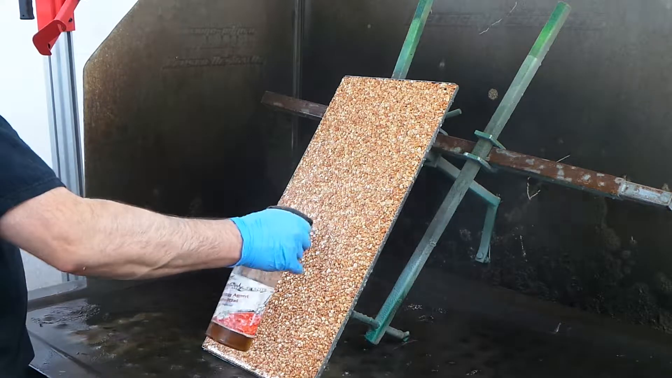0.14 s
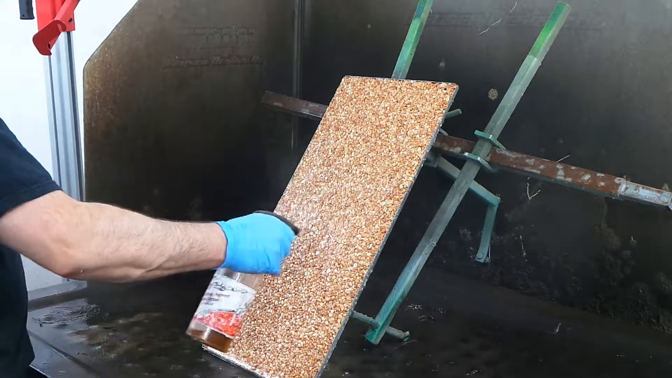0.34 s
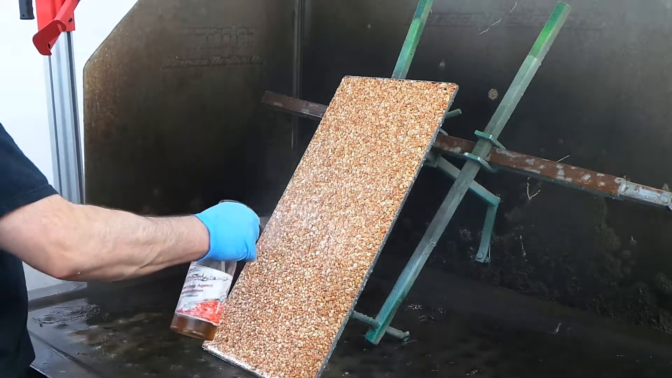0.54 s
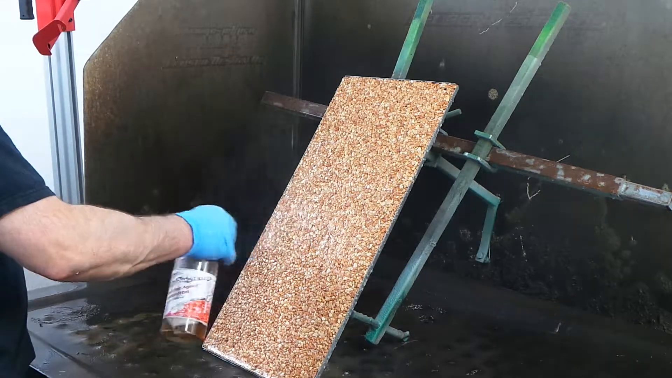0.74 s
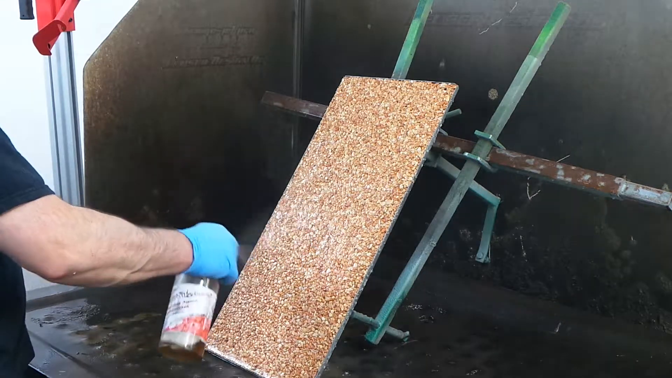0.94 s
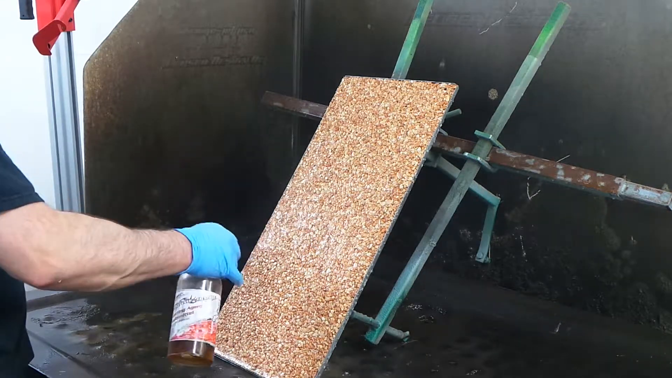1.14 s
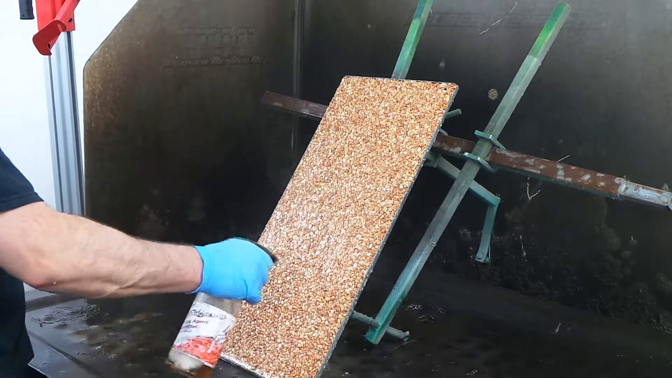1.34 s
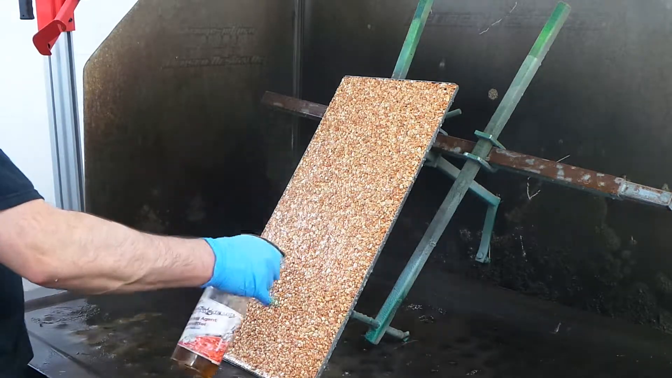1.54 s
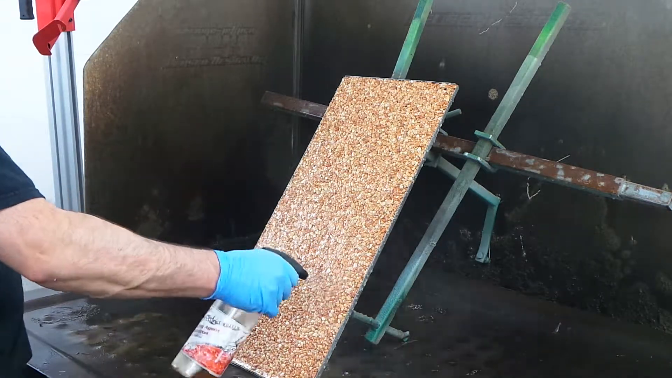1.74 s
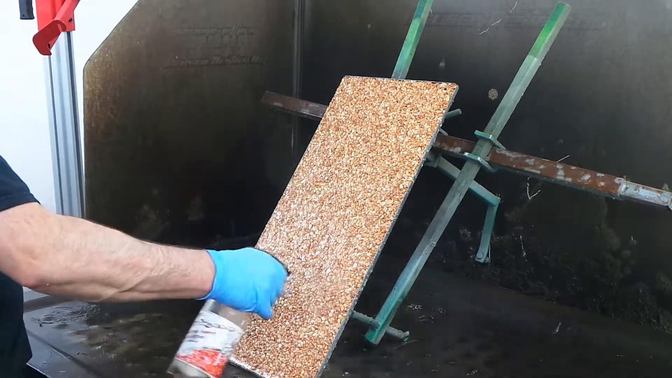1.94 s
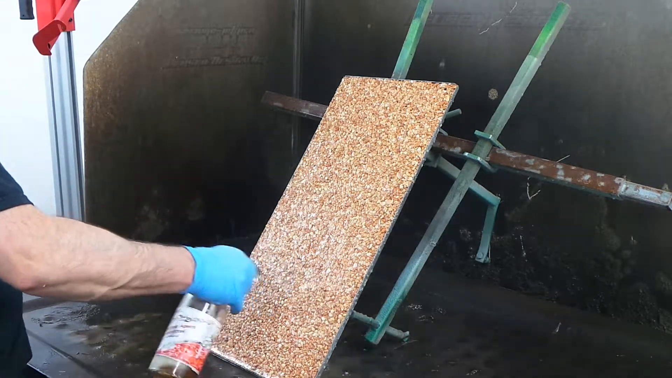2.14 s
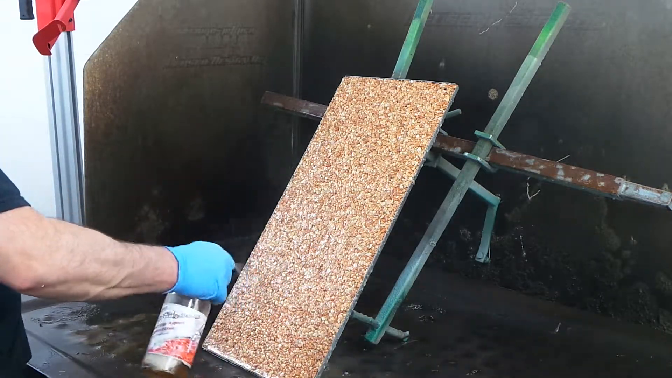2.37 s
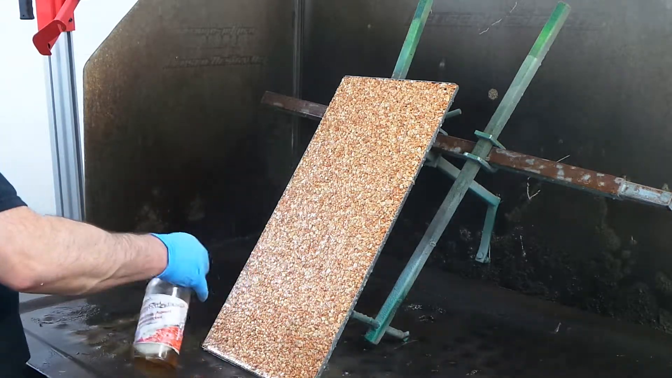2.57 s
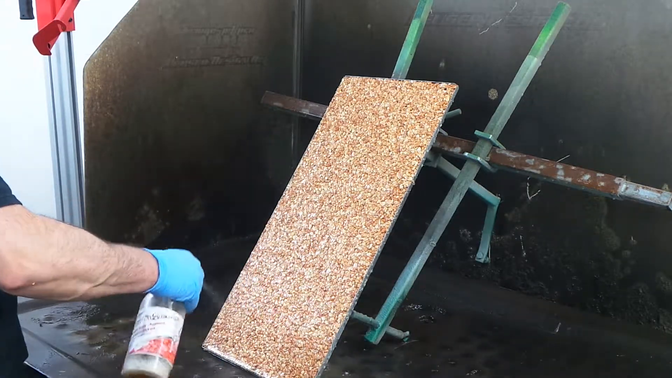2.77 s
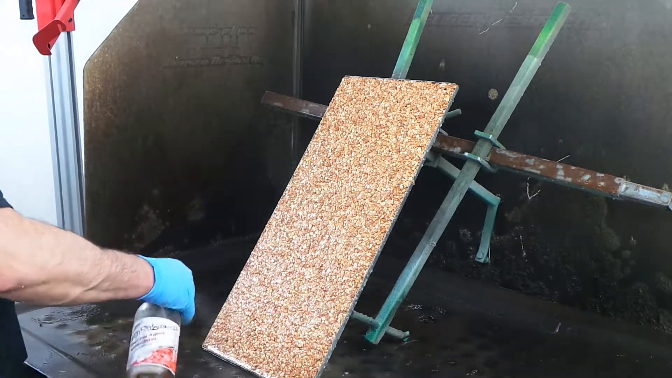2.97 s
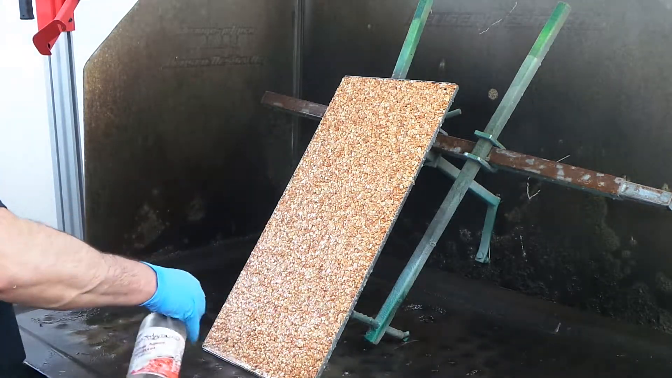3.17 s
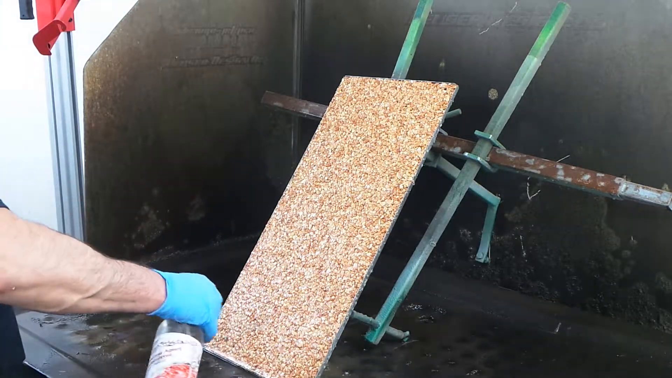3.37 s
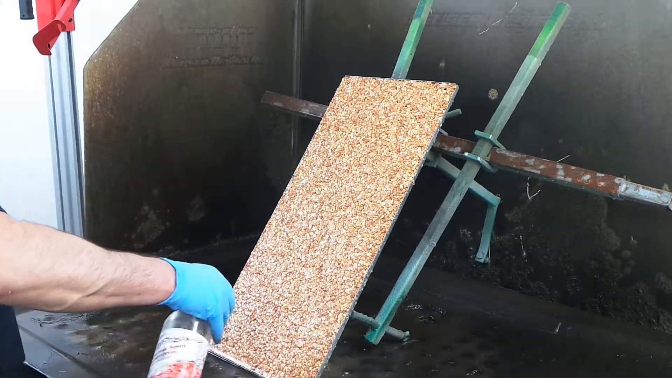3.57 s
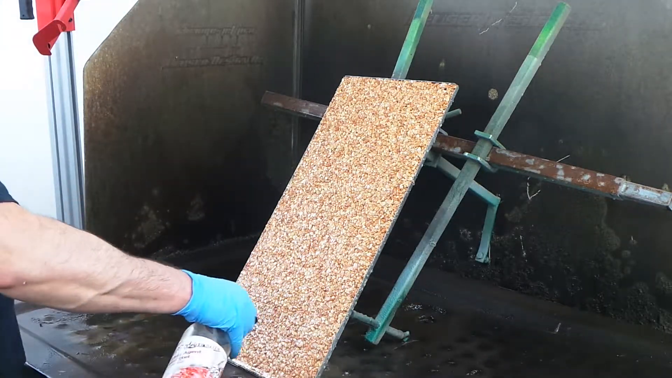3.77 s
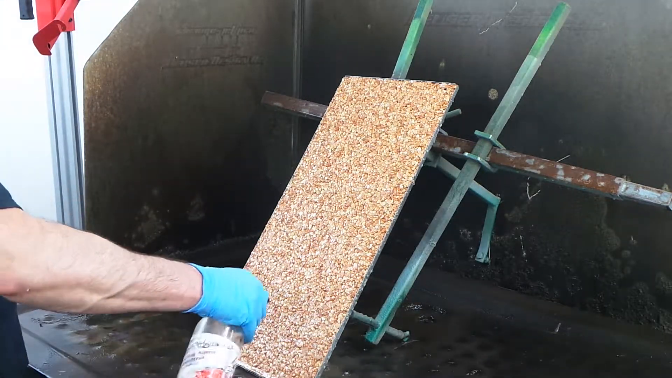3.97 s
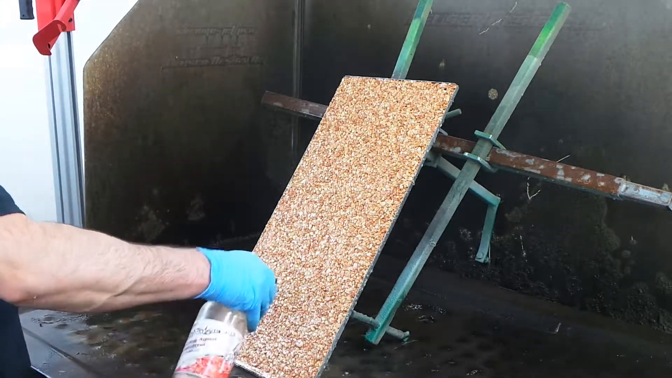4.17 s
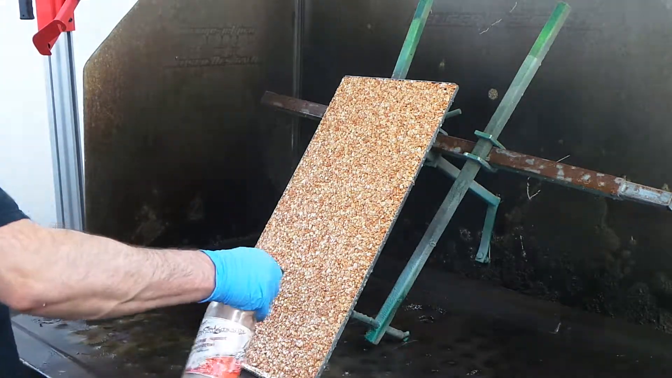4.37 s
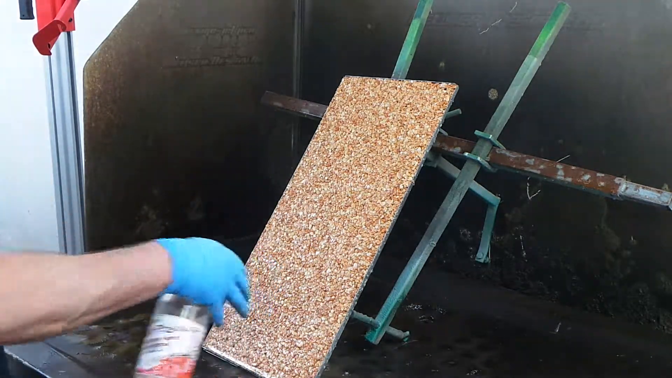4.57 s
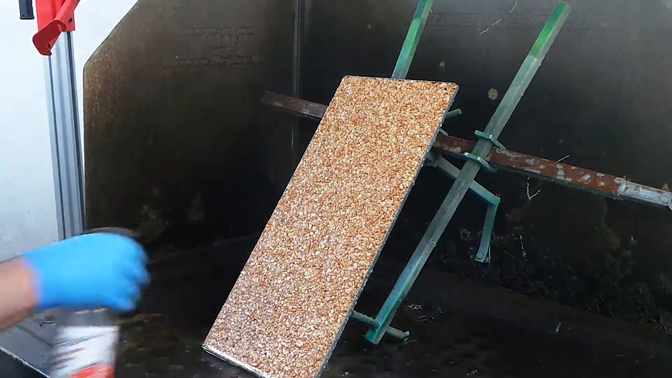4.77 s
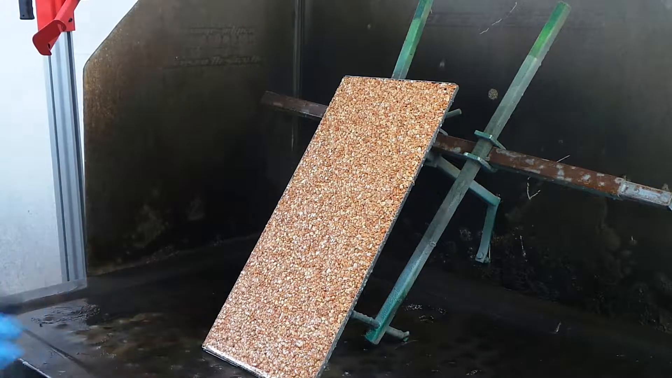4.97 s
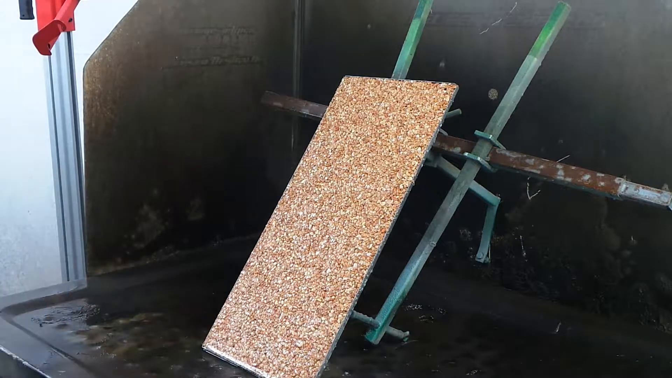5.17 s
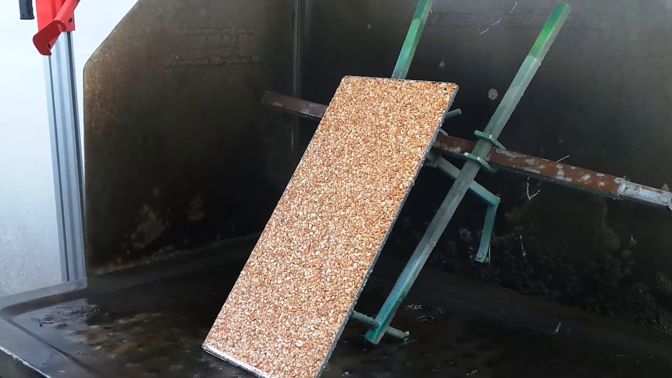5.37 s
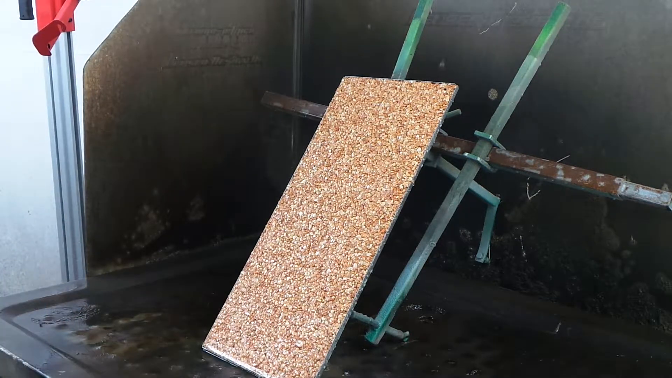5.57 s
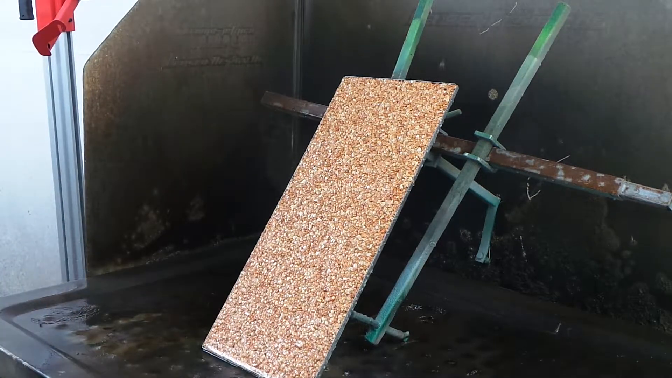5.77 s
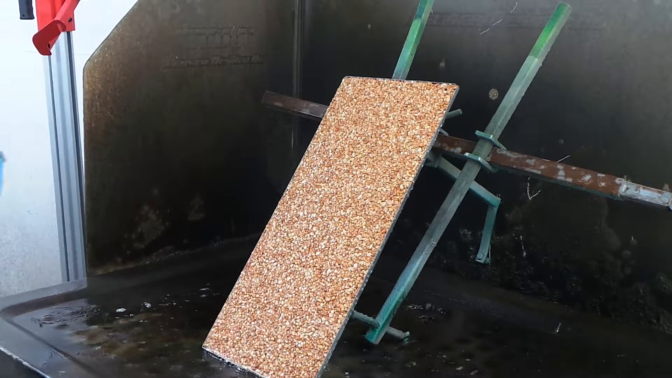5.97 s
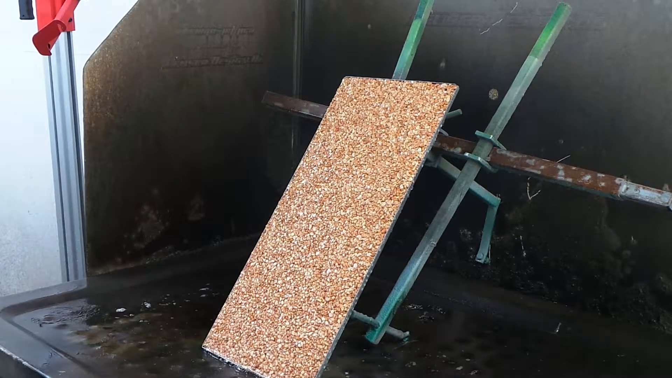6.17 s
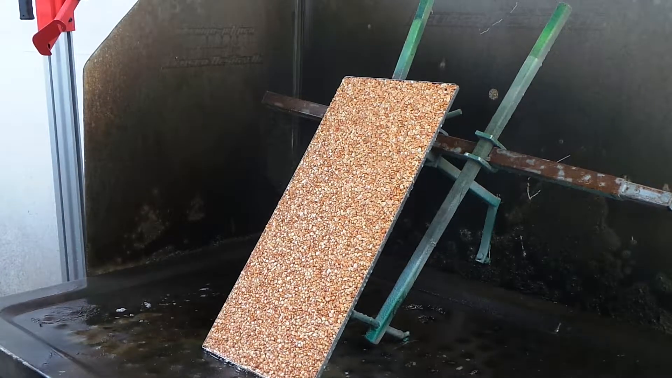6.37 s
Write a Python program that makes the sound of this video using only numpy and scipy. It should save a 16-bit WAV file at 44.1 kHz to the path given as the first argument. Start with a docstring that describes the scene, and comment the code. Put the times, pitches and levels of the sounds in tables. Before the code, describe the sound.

A trigger spray bottle squirts hissing mist onto a board about three times a second, then stops, over faint air hiss and hum.

```python
"""Trigger bottle in a spray booth

A hand trigger bottle is squeezed about three times a second towards a board in a metal spray booth.
Each squeeze opens the valve with a tick, then mist hisses from the nozzle and patters on the board.
A low thud and a later sharp tap sound nearby; an air hiss and a mains hum run throughout."""
import sys
import numpy as np
from scipy import signal
from scipy.fft import rfft, irfft, next_fast_len
from scipy.io import wavfile

SR = 44100
rng = np.random.default_rng(int(sys.argv[2]) if len(sys.argv) > 2 else 0)


def unload_audio(sound):
    """Save the sound as a 16-bit wav file, at the path given as the first command line argument."""
    columns = np.transpose(np.atleast_2d(sound))
    # keep every value between -1 and 1, then stretch to whole-number steps
    steps = np.round(np.clip(columns, -1, 1) * 32767)
    wavfile.write(sys.argv[1], SR, steps.astype(np.int16))


N = 283122

LOW_EDGES_HZ = np.geomspace(120, 1900, 13)


def amp(db):
    """dB to gain."""
    return 10 ** (np.asarray(db) / 20)


def rms_one(x):
    """Scales to rms 1."""
    return x / np.sqrt(np.mean(x ** 2) + 1e-20)


def in_time(rows):
    """Rows of (time_s, value) as a curve over all samples."""
    return np.interp(np.arange(N) / SR, *np.transpose(rows))


def bandpass(x, order, low_hz, high_hz):
    """Butterworth band-pass."""
    return signal.sosfilt(signal.butter(order, [low_hz, high_hz], "band", fs=SR, output="sos"), x)


def coloured(x, spectrum):
    """Shapes x by rows of (freq_hz, gain_db); rms 1."""
    size = next_fast_len(N)
    bin_hz = np.maximum(np.arange(size // 2 + 1) * SR / size, 1)
    freq_hz, gain_db = np.transpose(spectrum)
    gain = amp(np.interp(np.log(bin_hz), np.log(freq_hz), gain_db))
    return rms_one(irfft(rfft(x, size) * gain, size)[:N])


def drift(rate_hz):
    """Smooth random curve; rms 1."""
    hop, settle = 20, 4000
    r = np.exp(-2 * np.pi * rate_hz * hop / SR)
    white = rng.standard_normal(N // hop + settle + 2)
    slow = signal.lfilter([1], [1, -2 * r, r * r], white)[settle:]
    return np.interp(np.arange(N) / hop, np.arange(len(slow)), rms_one(slow))


def patchy(x, edges_hz, depth_db, rate_hz):
    """Each band swells and sinks on its own, the lowest most; rms 1."""
    size = next_fast_len(N)
    spectrum, out = rfft(x, size), x.copy()
    bins = (edges_hz * size / SR).astype(int)
    for k, (low, high) in enumerate(zip(bins, bins[1:])):
        band = np.zeros_like(spectrum)
        band[low:high] = spectrum[low:high]
        gain = amp(depth_db * 0.93 ** k * drift(rate_hz))
        out += irfft(band, size)[:N] * (gain - 1)
    return rms_one(out)


def droplets(per_s, spread_db):
    """Random impacts of uneven size."""
    sizes = amp(spread_db * np.minimum(rng.exponential(1, N), 4)) * rng.choice([-1, 1], N)
    return sizes * (rng.random(N) < per_s / SR)


def strike(start_s, level_db, modes):
    """Each blow rings every mode with a randomly varied strength."""
    out, at = np.zeros(N), (start_s * SR).astype(int)
    scatter_db = rng.normal(0, 2.5, (len(at), len(modes)))
    for k, (pitch_hz, gain_db, t60_s) in enumerate(modes):
        clicks = np.full(N, 1e-18)
        clicks[at] = (-1) ** k * amp(level_db + gain_db + scatter_db[:, k])
        r, w = amp(-60 / (t60_s * SR)), 2 * np.pi * pitch_hz / SR
        out += signal.lfilter([0, np.sin(w)], [1, -2 * r * np.cos(w), r * r], clicks)
    return out


def echo(start_s, spectrum, level_db, rise_s, t60_s):
    """Reflections build up, then die away as coloured noise."""
    since_s = np.maximum(np.arange(N) / SR - start_s, 0)
    envelope = amp(level_db - 60 * since_s / t60_s) * (1 - np.exp(-since_s / rise_s))
    return envelope * coloured(rng.standard_normal(N), spectrum)


def air_hiss():
    """Broad, wavering air noise with narrow duct resonances."""
    spectrum = [(15, -58), (25, -20), (60, -14.5), (85, -6), (130, -17), (400, -14), (520, -21.5),
                (680, -16.5), (900, -21), (1080, -17), (1300, -15), (2900, -19), (3700, -15), (6000, -13),
                (11900, -7.5), (14400, -8)]  # broad hiss: freq_hz, gain_db
    resonances = [(140, 18, -4.5), (276, 16.4, -9.5), (422, 16, -1.5), (895, 52, -4.5), (1410, 4.9, 4),
                  (1492, 13, -3.5), (1782, 10.4, 2.5), (1895, 37, -11), (1966, 28, -1), (2075, 65, -3.5),
                  (2291, 57, -1.5), (2525, 41, -7), (2742, 29, -5), (3120, 8.1, 0), (3390, 73, -10.5),
                  (3744, 16, 2), (7120, 53, 0), (7490, 270, -5.5), (7850, 56, -3.5), (12100, 290, -1),
                  (12500, 90, -22), (12950, 39, 2)]  # duct modes: pitch_hz, width_hz, gain_db
    levels = [(0.0, -46), (3.0, -44.5), (4.4, -44.5), (5.45, -46.5), (6.42, -44.5)]  # hiss envelope: time_s, level_db
    broad, drive = rng.standard_normal((2, N))
    ducts = np.zeros(N)
    for pitch_hz, width_hz, gain_db in resonances:
        r, w = np.exp(-np.pi * width_hz / SR), 2 * np.pi * pitch_hz / SR
        ring = signal.lfilter([1 - r * r, 0, r * r - 1], [1, -2 * r * np.cos(w), r * r], drive)
        ducts += amp(gain_db) * ring
    air = coloured(broad, spectrum) + amp(-7) * rms_one(ducts)
    return amp(in_time(levels)) * patchy(air, LOW_EDGES_HZ, depth_db=4.8, rate_hz=10.5)


def mains_hum(pitch_hz=100.1):
    """A low tone wavering in level and phase."""
    levels = [(0, -63), (4.3, -65.5), (5.0, -67), (6.42, -67)]  # hum envelope: time_s, level_db
    gain = amp(in_time(levels) + 1.3 * drift(4.8))
    phase = 2 * np.pi * pitch_hz * np.arange(N) / SR + 0.34 * drift(6.8)
    return gain * np.sqrt(2) * np.sin(phase)


def squeezes():
    """Gains of jet, patter, fizz and drumming: each squeeze leaps, swells, is held, then drains."""
    # trigger strokes, the last three columns relative to the jet:
    # start_s, open_db, swell_s, full_db, hold_s, sag_db, patter_db, fizz_db, drum_db
    strokes = [ (-0.150, -43, 0.098, -40.5, 0.054, -2.5, -9, -0.5, -8.5),
               (0.203, -41.5, 0.087, -37.5, 0.083, 1.5, -9.5, -1, -8.5),
               (0.554, -41, 0.12, -37.5, 0.061, 3.5, -9, -1, -10.5),
               (0.894, -46, 0.12, -38, 0.061, 2, -10, -0.5, -8.5),
               (1.245, -45, .12, -36.5, 0.055, 2, -9, 0, -12),
               (1.604, -44.5, .078, -37.5, 0.082, -0.5, -13, 0.5, -13),
               (1.930, -55, 0.12, -38, 0.09, -1.3, -11, 0.5, -11),
               (2.328, -49.5, 0.098, -38.5, 0.089, 1, -10, 1.3, -18.5),
               (2.690, -44, 0.087, -38.5, 0.076, 1.9, -12.5, 0.5, -22),
               (3.021, -47, 0.12, -37, 0.04, 0.5, -11.5, 1, -19),
               (3.320, -54, 0.12, -37.5, 0.099, 1.5, -16, 2, -30),
               (3.704, -43.5, 0.046, -38, 0.13, 5.5, -22, -1, -45),
               (4.015, -49.5, 0.06, -38, 0.1, .3, -15, 1.1, -55),
               (4.332, -45.5, 0.086, -33, .01, 1, -30, 1.6, -57), ]
    open_db_per_s, drain_db_per_s, drum_db_per_s = 800, 114.5, 50
    linger_db, linger_db_per_s = -24.5, 30
    t, power = np.arange(0, N / SR + 0.002, 0.001), 0
    for start_s, open_db, swell_s, full_db, hold_s, sag_db, patter_db, fizz_db, drum_db in strokes:
        since_s = t - start_s
        after_s = np.maximum(since_s - swell_s - hold_s, 0)
        push_db = np.interp(since_s, [0, swell_s, swell_s + hold_s], [open_db, full_db, full_db - sag_db])
        # pressure drains fast; the last mist lingers
        drain_db = np.maximum(-drain_db_per_s * after_s, linger_db - linger_db_per_s * after_s)
        jet_db = push_db + drain_db + open_db_per_s * np.minimum(since_s, 0)
        # a weak jet spatters more and fizzes less
        below_db = np.maximum(full_db - jet_db, 0)
        patter_rel_db = np.interp(below_db, [0, 15.5], [patter_db, -2.5])
        fizz_rel_db = fizz_db - below_db * np.where(since_s < swell_s, 0.3, 0.4)
        # the first slug of liquid drums hardest
        drum_rel_db = drum_db - drum_db_per_s * np.maximum(since_s, 0)
        power += amp(jet_db + np.array([0 * t, patter_rel_db, fizz_rel_db, drum_rel_db])) ** 2
    return [np.interp(np.arange(N) / SR, t, np.sqrt(p)) for p in power]


def spray():
    """Turbulent mist at the nozzle, fine fizz on top, droplets pattering and drumming on the board."""
    nozzle = [(700, -63), (1100, -23), (2000, -6), (3330, -5.5), (4070, -2.5), (5080, -1), (5980, 0),
              (9500, -0.5), (12400, -33), (20900, -120)]  # jet spectrum: freq_hz, gain_db
    board_face = [(380, -19), (650, -6), (815, -8.5), (1200, -0.5), (1750, 0), (2800, 1), (3640, -1),
                  (6160, -120)]  # patter spectrum: freq_hz, gain_db
    board_body = [(110, -6), (150, -12), (250, 3), (340, -5.5), (450, 2), (600, -5.5), (720, 0), (830, 6),
                  (950, -4.5), (1200, -24.5)]  # drumming spectrum: freq_hz, gain_db
    jet_gain, patter_gain, fizz_gain, drum_gain = squeezes()
    sputter = amp(0.17 * drift(28) + 0.5 * drift(220))  # liquid leaves the nozzle unevenly
    jet = coloured(droplets(per_s=14000, spread_db=1.2), nozzle)
    fizz = bandpass(droplets(per_s=16000, spread_db=1.2), 4, low_hz=9760, high_hz=15500)
    landing = patchy(droplets(per_s=7000, spread_db=2.9), LOW_EDGES_HZ, depth_db=5.76, rate_hz=11.7)
    jet = patchy(jet, np.geomspace(1500, 10000, 9), depth_db=1.4, rate_hz=15)
    fizz = patchy(fizz, np.linspace(9000, 14600, 8), depth_db=0.62, rate_hz=4.4)
    board = patter_gain * coloured(landing, board_face) + drum_gain * coloured(landing, board_body)
    return sputter * (jet_gain * jet + fizz_gain * fizz + board)


def valve(spit_t60_s=0.032):
    """A plastic tick, a spit of air and liquid, and a knock from the bottle."""
    ticks = [(.183, -38, -55, -54), (.197, -32, -47, -52), (.211, -30, -42, -53), (0.221, -19, -47, -57),
             (0.551, -31, -48, -71), (.559, -29, -44, -66), (0.5676, -26, -39, -46),
             (0.8958, -35, -35, -56), (0.898, -30, -41, -66), (0.9026, -34, -52, -62),
             (1.249, -25, -47, -52), (1.595, -38, -49, -61), (1.6087, -25, -36.5, -64),
             (1.929, -40, -55, -58), (2.3508, -40.5, -45, -63), (2.689, -42, -38, -63),
             (2.7103, -32, -36, -66), (3.023, -33, -43, -72), (3.707, -35, -33, -50.5),
             (4.27, -38, -54, -60)]  # valve ticks: start_s, tick_db, spit_db, knock_db
    tick_modes = [(2400, -35, 0.0044), (3670, -31, 0.0059), (5300, -6.5, 0.0051), (7400, -10, .005),
                  (10000, -19, 0.0036), (12500, -21, .003)]  # valve modes: pitch_hz, gain_db, t60_s
    knock_modes = [(328, 4.5, 0.051), (466, 6.5, 0.01), (860, -3, 0.034)]  # bottle modes: pitch_hz, gain_db, t60_s
    spit_spectrum = [(900, -46), (1800, 3.5), (3500, -2), (6000, 3), (10000, -12), (14400, -4)]  # spit noise: freq_hz, gain_db
    start_s, tick_db, spit_db, knock_db = np.transpose(ticks)
    openings = np.full(N, 1e-18)
    openings[(start_s * SR).astype(int)] = amp(spit_db)
    envelope = signal.lfilter([1], [1, -amp(-60 / (spit_t60_s * SR))], openings)
    spit = envelope * coloured(rng.standard_normal(N), spit_spectrum)
    return strike(start_s, tick_db, tick_modes) + spit + strike(start_s, knock_db, knock_modes)


def sizzles(width_hz=450):
    """Air drawn into the jet makes the nozzle sing briefly in a narrow band."""
    bursts = [(2.48, .06, 13500, -46), (2.705, .03, 12500, -55), (2.76, .03, 13000, -44),
              (3.1, .04, 14100, -44), (3.165, .05, 14400, -47), (3.48, .06, 13900, -45),
              (4.1, .05, 14300, -67), (4.417, .04, 9400, -48)]  # nozzle sizzles: centre_s, length_s, pitch_hz, level_db
    t, white, out = np.arange(N) / SR, rng.standard_normal(N), np.zeros(N)
    for centre_s, length_s, pitch_hz, level_db in bursts:
        band = bandpass(white, 2, pitch_hz - width_hz / 2, pitch_hz + width_hz / 2)
        envelope = amp(level_db) * np.exp(-(2 * (t - centre_s) / length_s) ** 2)
        out += envelope * rms_one(band)
    return out


def thud():
    """A soft heavy contact in several bumps rings low modes; the room rumbles after it."""
    bumps = [(3.311, -46.5), (3.324, -42), (3.349, -43.5), (3.406, -49.5)]  # contacts: start_s, strength_db
    modes = [(85, -7.5, 0.63), (144, -1, 0.19), (197, 10.5, 0.058), (237, 12, 0.041), (293, 2.5, 0.078),
             (505, -2.5, 0.074)]  # low modes: pitch_hz, gain_db, t60_s
    rumble = [(40, -24), (80, -13), (145, 0), (250, -7.5), (330, -9.5), (420, -21), (500, -10), (700, -57)]  # room echo: freq_hz, gain_db
    start_s, strength_db = np.transpose(bumps)
    body = bandpass(strike(start_s, strength_db, modes), 2, low_hz=80, high_hz=600)
    return body + echo(start_s[1], rumble, level_db=-38.5, rise_s=0.042, t60_s=0.77)


def whine(pitch_hz=1480):
    """A faint, brief, wavering tone."""
    levels = [(5.12, -95), (5.2, -66), (5.42, -64), (5.5, -95)]  # whine envelope: time_s, level_db
    phase = 2 * np.pi * pitch_hz * np.arange(N) / SR + 0.51 * drift(4.2)
    return amp(in_time(levels)) * np.sqrt(2) * np.sin(phase)


def tap():
    """Four quick hard contacts echo in the booth; the bright part dies first."""
    contacts = [(5.891, -25), (5.8943, -24), (5.8962, -25), (5.8982, -19.5)]  # hard contacts: start_s, strength_db
    modes = [(2000, -18, 0.0033), (4700, -12, 0.0035), (6750, -11, 0.0044), (8160, -11, 0.0063),
             (10500, -11, .003), (13000, -19, .002)]  # high modes: pitch_hz, gain_db, t60_s
    bright_spectrum = [(3000, -32), (6500, -4), (8200, -2), (11000, -7), (14400, -12)]  # short echo: freq_hz, gain_db
    tail_spectrum = [(590, -19.5), (1200, -13), (2000, -12.5), (3500, -11.5), (6400, -6), (8000, -8.5),
                     (14400, -25)]  # duller, lingering echo: freq_hz, gain_db
    start_s, strength_db = np.transpose(contacts)
    bright = echo(start_s[1], bright_spectrum, level_db=-40, rise_s=0.003, t60_s=0.23)
    clicks = strike(start_s, strength_db, modes)
    tail = echo(start_s[0], tail_spectrum, level_db=-37.5, rise_s=0.0086, t60_s=0.51)
    return clicks + bright + tail


def scene():
    """All sources in mono, on two channels."""
    mono = spray() + sizzles() + valve() + thud() + tap() + air_hiss() + mains_hum() + whine()
    return np.array([mono, mono])


def record(dry, cutoff_hz=14520):
    """Steep low-pass."""
    return signal.sosfilt(signal.ellip(18, 0.3, 70, cutoff_hz, fs=SR, output="sos"), dry)


dry = scene()
out = record(dry)
unload_audio(out)
```